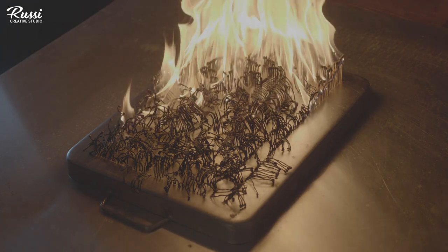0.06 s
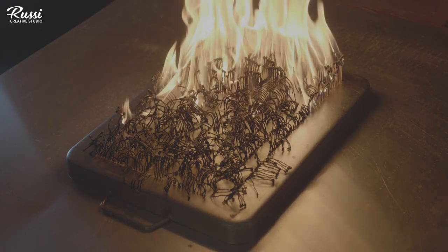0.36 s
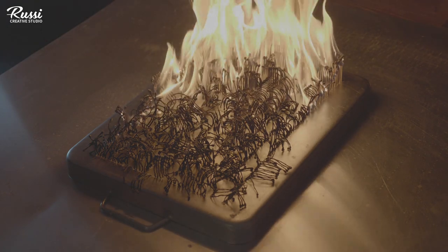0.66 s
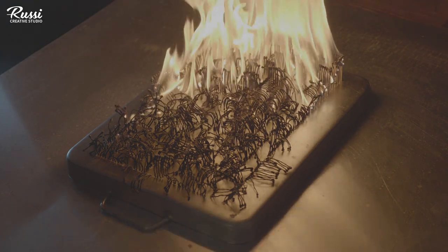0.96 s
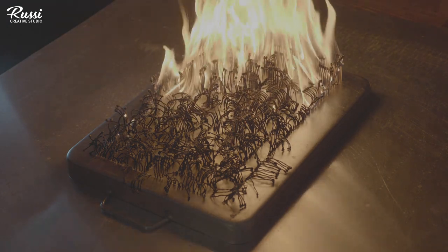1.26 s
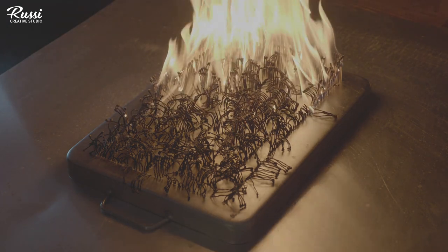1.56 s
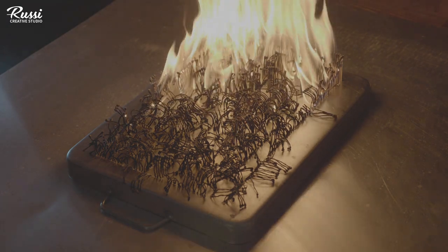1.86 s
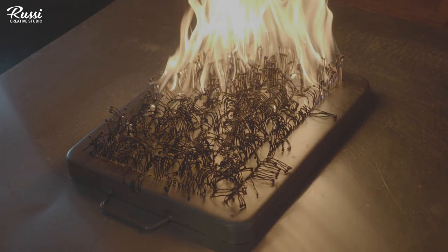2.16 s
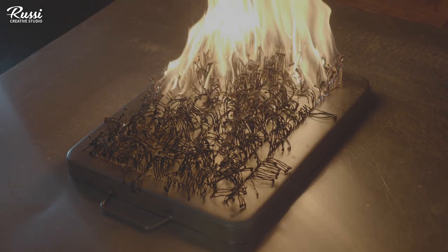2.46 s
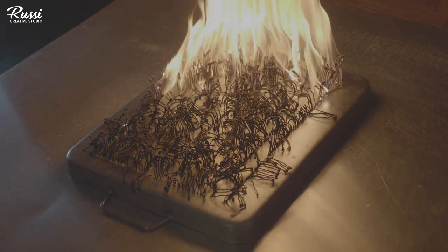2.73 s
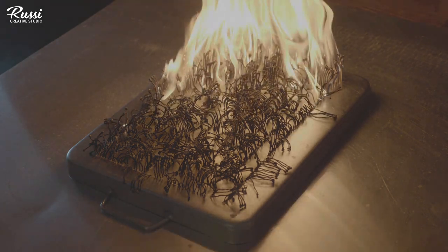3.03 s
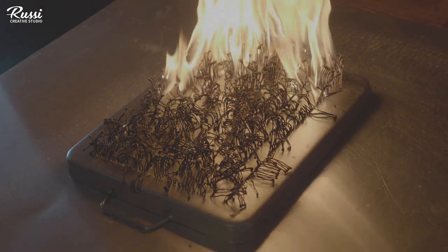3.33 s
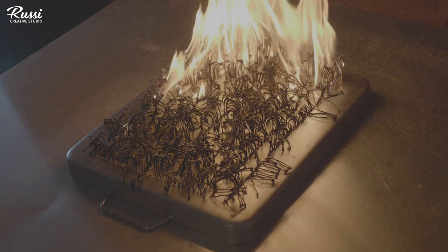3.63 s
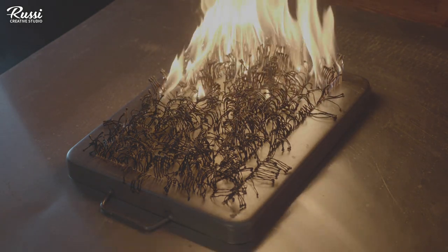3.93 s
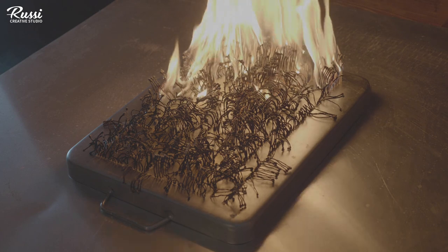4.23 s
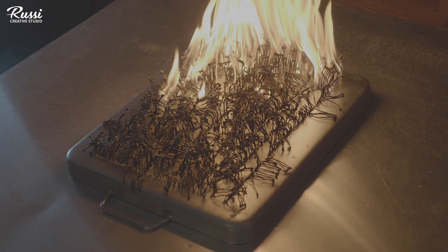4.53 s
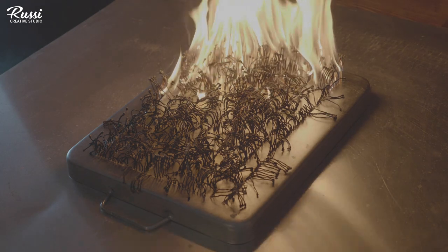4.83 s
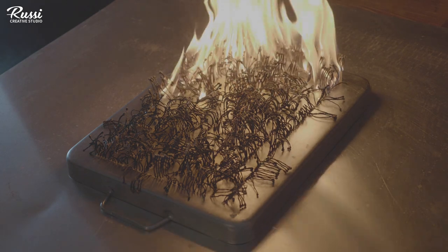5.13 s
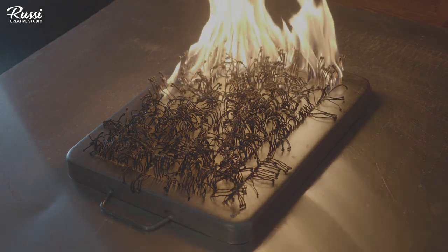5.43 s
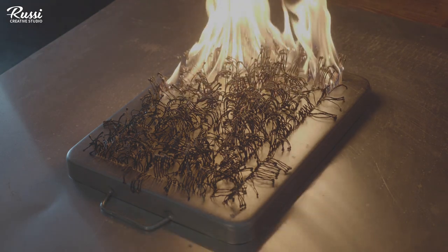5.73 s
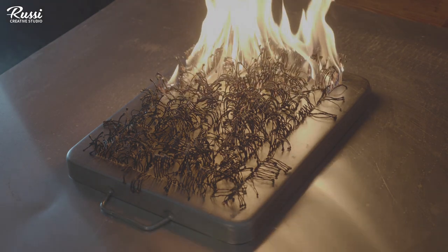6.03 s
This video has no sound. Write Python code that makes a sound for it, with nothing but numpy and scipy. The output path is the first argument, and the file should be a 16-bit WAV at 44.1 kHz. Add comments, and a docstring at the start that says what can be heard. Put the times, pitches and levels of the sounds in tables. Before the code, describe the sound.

Overlapping bursts of fizzing hiss come from match heads catching fire, mixed with crisp crackles and a soft, steady flame rush. The hissing fades around the middle, and the quieter fire keeps sizzling and ticking while sticks snap irregularly and gas puffs out twice. It is heard from nearby in a small, hard-walled room that gives each snap a brief echo.

```python
"""In a small room with hard walls, a bed of upright matchsticks burns on a tray.
The flames make a low, steady rush, the hot wood sizzles and trapped gas puffs out.
Match heads flare up as tiny jets, in hissing waves that die down about halfway through.
Embers tick and the charring sticks snap. Each snap is one very short pulse,
followed by a few close echoes and a brief tail of room sound."""
import sys
import numpy as np
from scipy import signal
from scipy.fft import rfft, irfft
from scipy.io import wavfile

SR = 44100
rng = np.random.default_rng(int(sys.argv[2]) if len(sys.argv) > 2 else 0)


def inscribe(sig):
    """Save sig as 16-bit PCM at rate SR to the path in sys.argv[1].

    A 1-D sig is mono; a 2-D sig holds one channel per row.
    Samples are clipped to [-1, 1] before scaling.
    """
    pcm = np.round(np.clip(np.atleast_2d(sig).T, -1, 1) * 32767)
    wavfile.write(sys.argv[1], SR, pcm.astype(np.int16))


N = 268128
TIME_S = np.arange(N) / SR
FREQUENCIES_HZ = np.maximum(np.arange(N // 2 + 1) * SR / N, 1)
CUTOFF_HZ = 15900


def from_db(db):
    """Turn decibels into a number to multiply a sound by."""
    return 10 ** (np.asarray(db) / 20)


def unit_level(x):
    """Scale a signal so that its average level (rms) is 1."""
    return x / np.sqrt(np.mean(x ** 2) + 1e-20)


def band(x, low_hz, high_hz, order=1):
    """Keep the sound between two pitches; a higher order cuts the rest more sharply."""
    edges_hz = [low_hz, min(high_hz, .47 * SR)]
    return signal.sosfilt(signal.butter(order, edges_hz, "band", fs=SR, output="sos"), x + 1e-18)


def drift(rate_hz):
    """A smooth random wobble with a typical size of 1."""
    points = rng.standard_normal(4096)
    return unit_level(np.interp(TIME_S * rate_hz * 2, np.arange(len(points)), points))


# Pitches that the tray, table and room boost or swallow: pitch_hz, width_hz, lift_db
SURROUNDING_RESONANCES = [(238.6, 9.3, 11.5), (260, 12, -7), (279, 16, 9), (345, 30, 4), (360, 9, 9),
                          (386, 24, 5), (505, 40, 9), (531, 16, 11), (562, 13, -8), (587, 12, 6),
                          (603, 10, -6), (632, 18, 5), (663, 18, 8), (681, 10, -5), (722, 33, 7),
                          (872.3, 24, 10.5), (904, 17, 7), (968, 8, 9), (1025, 57, 5), (1195, 20, 6),
                          (1392, 14, 8), (1472, 14, 7), (1630, 20, 5), (1810, 18, 7), (1965, 20, 8),
                          (2085, 60, -6), (2153, 14, 6), (2240, 18, 7), (2396, 20, 7), (2850, 400, -3),
                          (3535, 25, 4.5), (3655, 25, 3.5), (3980, 25, 3.5), (4289, 18, 5), (4410, 18, 4.5),
                          (4489, 16, 4.5), (4614, 16, 5), (4740, 18, 4), (4985, 25, 3.5), (5350, 300, 2),
                          (5987, 18, 6), (6305, 25, 5), (7350, 320, 3), (9200, 300, 2.5)]
def colouring(spectrum, hz, depth=1):
    """Gain at each pitch: a broad tone shape plus the resonances, their lift multiplied by depth."""
    points_hz, points_db = np.transpose(spectrum)
    broad_db = np.interp(np.log(hz), np.log(points_hz), points_db)
    resonance_db = sum(lift_db / (1 + (2 * (hz - pitch_hz) / width_hz) ** 2)
                       for pitch_hz, width_hz, lift_db in SURROUNDING_RESONANCES)
    return from_db(broad_db + depth * resonance_db)


def turbulence(spectrum, side_db, wide_above_hz):
    """Swirling gas makes stereo noise, coloured by its surroundings; side_db sets how wide it sounds."""
    white = rng.standard_normal((2, N))
    middle, side = irfft(rfft(white) * colouring(spectrum, FREQUENCIES_HZ), N)
    side = from_db(side_db) * band(side, wide_above_hz, SR, order=2)   # low sounds reach both ears alike
    return unit_level(middle + np.array([side, -side]))


# First echoes from nearby surfaces: delay_s, left_db, right_db
CLOSE_ECHOES = [(.0058, -9.0, -4.0), (.0068, -6.5, -19.0), (.0078, -16.0, -15.0), (.0093, -13.0, -18.0)]
# Tone of the room's tail: pitch_hz, relative_db
TAIL_SPECTRUM = [(150, -8), (1500, -16), (2200, 6.5), (4500, 0.1), (6500, -0.5), (10000, -1.7),
                 (15500, 2.5), (20000, -13)]
def room_echoes(resonance_depth=0, fade_60db_s=0.25, build_s=0.0034, tail_db=2.27, side_db=-9):
    """The room answers a click with a few close echoes and a dense tail, wide only in the treble."""
    t = np.arange(SR // 3) / SR
    fade = from_db(-60 * t / fade_60db_s) * (1 - np.exp(-(t / build_s) ** 2))
    hz = np.maximum(np.fft.rfftfreq(len(t), 1 / SR), 1)
    colour = colouring(TAIL_SPECTRUM, hz, resonance_depth)
    noise = irfft(rfft(rng.standard_normal((2, len(t)))) * colour, len(t))
    middle, side = noise * fade / np.linalg.norm(fade)
    side = from_db(side_db) * band(side, 2800, SR, order=2)
    answer = from_db(tail_db) * np.array([middle + side, middle - side])
    for delay_s, left_db, right_db in CLOSE_ECHOES:
        answer[:, round(delay_s * SR)] += from_db([left_db, right_db])
    return answer


# Tone of the flames' rush: pitch_hz, relative_db
RUSH_SPECTRUM = [(20, -33), (90, -37), (150, -32.5), (200, -25), (250, -12), (300, -8), (480, -4.5),
                 (580, -3.5), (700, -4.5), (1000, -7), (1300, -10.5), (1700, -15.5), (2300, -17),
                 (4000, -37), (9000, -62)]
# Moments when the low rush briefly grows louder (+) or softer (-): peak_s, lift_db
RUSH_SWELLS = [(0.07, 3.5), (0.27, -5), (0.94, 3), (1.17, 4), (1.4, 3.5), (2.04, 4), (2.32, -2.5),
               (3.46, -2), (3.71, 3), (4.3, 0.5), (4.97, -5), (5.05, 3.5), (5.13, -2), (5.57, 3),
               (5.66, 4.5), (5.76, -1.5), (5.84, 1.5)]
def flames(start_db=-55, fade_db_per_s=0.33, swell_s=0.03, flutter_db=1.0):
    """The tall flames make a low, fluttering rush that slowly fades, with brief swells and dips."""
    swell_db = sum(lift_db * np.exp(-((TIME_S - peak_s) / swell_s) ** 2)
                   for peak_s, lift_db in RUSH_SWELLS)
    level_db = start_db - fade_db_per_s * TIME_S + swell_db + flutter_db * drift(14)
    return from_db(level_db) * turbulence(RUSH_SPECTRUM, side_db=-33.5, wide_above_hz=1200)


# Tone of the sizzling wood: pitch_hz, relative_db
SIZZLE_SPECTRUM = [(200, -44), (2000, -5), (3500, -0.5), (5500, -2.5), (7400, -1), (10300, -6), (13000, 1),
                   (15500, 2)]
# How loud the sizzle is as time passes: time_s, level_db
SIZZLE_LOUDNESS = [(0, -51.5), (0.45, -80), (0.6, -62), (0.85, -56), (2.0, -58.5), (2.799, -54),
                   (3.35, -62), (3.53, -57.5), (3.61, -62.5), (3.8, -59.5), (4.25, -58.5), (4.38, -62),
                   (4.46, -59), (4.63, -60), (4.71, -55.5), (4.78, -59.5), (5.0, -54), (5.45, -57),
                   (5.66, -59), (5.82, -58.5), (5.95, -51), (6.08, -60)]
def wood_sizzle():
    """The hot wood keeps up a fine, bright sizzle that swells and lulls."""
    level_db = np.interp(TIME_S, *np.transpose(SIZZLE_LOUDNESS))
    return from_db(level_db) * turbulence(SIZZLE_SPECTRUM, side_db=-4.5, wide_above_hz=2500)


# Short puffs of gas: peak_s, tone_db, rise_s, fade_60db_s, low_pitch_hz, high_pitch_hz
GAS_PUFFS = [(3.875, -52, 0.0033, 0.2, 1630, 2200), (5.942, -50.5, 0.022, 0.22, 1530, 1630),
             (5.945, -46.5, 0.016, 0.15, 2570, 2700)]
def gas_puffs(width_ratio=1.078, hiss_vs_tone_db=-3.0):
    """Trapped gas escapes in short puffs, each with two breathy pitches over a broad hiss."""
    out = np.zeros(N)
    for peak_s, tone_db, rise_s, fade_60db_s, *pitches_hz in GAS_PUFFS:
        white = rng.standard_normal(N)
        tone = sum(band(white, hz / width_ratio, hz * width_ratio, order=2) for hz in pitches_hz)
        hiss = band(rng.standard_normal(N), 1400, 6500, order=2)
        rise = np.exp(np.minimum(TIME_S - peak_s, 0) / rise_s)
        fall = from_db(tone_db - 60 * np.clip(TIME_S - peak_s, 0, 1) / fade_60db_s)
        out += rise * fall * (unit_level(tone) + from_db(hiss_vs_tone_db) * unit_level(hiss))
    return out


# Groups of match heads catching fire:
# start_s, rise_s, burn_s, strength_db, extra_roar_db, extra_rasp_db, extra_fizz_db
HEAD_FLARES = [(-0.1, 0.04, 0.057, -52.5, 6, 0, -2), (0.08, 0.02, 0.35, -49.5, -0.5, -1, 2),
               (0.503, 0.026, 0.18, -48, -2, -4, 3), (0.6, 0.05, 0.11, -54, 6.5, -8, -1),
               (0.855, 0.048, 0.57, -45, 1.5, 2, -2), (1.0, 0.06, 0.21, -43.5, 1, 3.5, -15),
               (1.3, 0.023, 0.13, -46, 0.5, 4, -6), (1.451, 0.049, 0.42, -46.5, 1.5, -1, 1),
               (1.579, 0.0095, 0.033, -50, 4, 9, -12), (1.895, 0.088, 0.66, -43.5, -2, -3.5, -5),
               (2.09, 0.027, 0.057, -46, 6.5, 6.5, -2), (2.34, 0.011, 0.32, -48, 3, -1, -0.5),
               (2.73, 0.054, 0.1, -53.5, -5, -3, 0), (2.875, 0.055, 0.14, -48, -2, -3, -1),
               (3.12, 0.029, 0.15, -50.5, -0.5, -5.5, -4), (3.32, 0.034, 0.18, -59, 6.5, -3, 3)]
def blaze(full_blaze_db=-42.5, sag_db_per_s=2, fade_60db_s=0.5, roar_growth=1.41, rasp_growth=1.04):
    """Heads catch, weaken and die away: the strength of hiss, roar, rasp and fizz, 1 at full blaze."""
    power = np.zeros((4, N))
    for start_s, rise_s, burn_s, strength_db, extra_roar_db, extra_rasp_db, extra_fizz_db in HEAD_FLARES:
        age_s = np.maximum(TIME_S - start_s, 0)
        fall_db = sag_db_per_s * age_s + 60 * np.maximum(age_s - burn_s, 0) / fade_60db_s
        hiss = np.minimum(age_s / rise_s, 1) * from_db(strength_db - full_blaze_db - fall_db)
        roar = from_db(extra_roar_db) * hiss ** roar_growth   # grows faster than the hiss
        rasp = from_db(extra_rasp_db) * hiss ** rasp_growth
        fizz = from_db(extra_fizz_db) * hiss
        power += np.array([hiss, roar, rasp, fizz]) ** 2   # separate noises add up by power
    return np.sqrt(power)


def tray_bounce(sound, delay_s=0.00023, swing_s=0.00002, share=0.17):
    """The jets' sound bounces off the tray, sooner or later as they dance, gently shifting its tone."""
    samples = np.arange(N)
    lag = (delay_s + swing_s * drift(2.96)) * SR
    return sound + share * np.array([np.interp(samples - lag, samples, channel) for channel in sound])


# Tones of the jets' bright hiss, fine fizz, rough rasp and throaty roar: pitch_hz, relative_db
HISS_SPECTRUM = [(200, -43), (1200, -50), (2200, -13), (2900, -0.5), (3600, 1), (4950, 4.5), (6000, 0),
                 (8000, -3.5), (10000, -8.5), (12000, -5.5), (15500, -11)]
FIZZ_SPECTRUM = [(3000, -49), (5500, -5), (6800, -19), (8500, -15), (10200, -2), (11800, 1.5), (13500, 0),
                 (15500, -2)]
RASP_SPECTRUM = [(500, -39.5), (1500, -9), (2200, 2), (3100, 1), (4500, -8), (6500, -1), (10000, -15)]
ROAR_SPECTRUM = [(250, -50), (450, -25), (700, -4.5), (950, 1), (1500, 4), (2000, -2), (2600, -2.5),
                 (3500, -4.5), (6000, -36)]
def match_jets(hiss_db=-42.97, fizz_db=-48, rasp_db=-49, roar_db=-45.5, ember_db=-66, sputter_db=1.1):
    """Match heads burn as small, sputtering jets; returns their bright sounds and their lower roar."""
    hiss_strength, roar_strength, rasp_strength, fizz_strength = blaze()
    roar_gain = from_db(roar_db + 0.36 * drift(12)) * roar_strength
    roar_gain = np.hypot(roar_gain, from_db(ember_db))   # a little keeps burning between flares
    sputter = from_db(sputter_db * drift(40))
    hiss_gain = from_db(hiss_db + 0.3 * drift(3.61)) * hiss_strength
    hiss = hiss_gain * turbulence(HISS_SPECTRUM, side_db=-9.5, wide_above_hz=2100)
    fizz_gain = from_db(fizz_db + 2.0 * drift(12)) * fizz_strength
    fizz = fizz_gain * turbulence(FIZZ_SPECTRUM, side_db=-14.5, wide_above_hz=1700)
    rasp_gain = from_db(rasp_db + 1.6 * drift(14)) * rasp_strength
    rasp = rasp_gain * turbulence(RASP_SPECTRUM, side_db=-18, wide_above_hz=5700)
    roar = roar_gain * turbulence(ROAR_SPECTRUM, side_db=-50, wide_above_hz=270)
    return sputter * (tray_bounce(hiss + fizz) + rasp), sputter * roar


def fibre_crack(clicks, pitch_hz, width_ratio=1.71, bass_cut_ratio=0.31, ring_hz=7200, ring_share=0.34):
    """A wood fibre breaks at each click: one quick swing, with a trace of the stick's ring."""
    def swing(x):
        x = band(x, pitch_hz / width_ratio, pitch_hz * width_ratio)
        x = band(x, bass_cut_ratio * pitch_hz, SR, order=2)   # finer fibres have less bass
        return x + ring_share * band(x, ring_hz / 1.075, ring_hz * 1.02)
    one_crack = band(swing(signal.unit_impulse(256)), 20, CUTOFF_HZ, order=2)
    return swing(clicks) / np.linalg.norm(one_crack)   # the same energy at every pitch


def ember_ticks(ticks_per_s=45, base_db=-46, spread_db=1.5, flare_lift_db=19.5):
    """Embers tick at random, in clusters, most of them faintly, and harder while heads are flaring."""
    flaring = np.minimum(blaze()[0], 1)
    has_tick = rng.random(N) < ticks_per_s * from_db(3 * drift(4)) / SR
    scatter_db = spread_db * np.minimum(rng.exponential(1, N), 3.5)
    clicks = has_tick * from_db(base_db + scatter_db + flare_lift_db * flaring)
    pitches_hz = np.geomspace(5500, 11500, num=4)
    pitch_choice = rng.integers(0, len(pitches_hz), N)
    return sum(fibre_crack(clicks * (pitch_choice == k), hz) for k, hz in enumerate(pitches_hz))


# Sticks snapping, some dry, others with more room echo: start_s, strength_db, pitch_hz, extra_room_db
STICK_SNAPS = [(0.0651, -2.5, 9100, -0.3), (0.3712, -13.5, 9000, -12), (0.716, -18.5, 12000, -9),
               (0.7488, -11.5, 7060, -3.5), (0.821, -24.5, 10060, -11), (0.9113, -20, 9550, 2),
               (0.962, -17.5, 10800, 2), (1.0373, -9, 6500, -8), (1.1034, -18, 9000, 1),
               (1.1743, -6.5, 12600, -4.5), (1.4701, -14.5, 5970, -2), (1.6172, -17, 5530, -14),
               (1.6732, -24, 9900, -6), (1.6929, -15, 10000, 1.5), (2.001, -15.5, 11500, -13),
               (2.0672, -11.5, 13800, -5), (2.1387, -4.5, 14100, -3), (2.5218, -11.5, 6900, -14),
               (2.6893, -17.5, 9020, -1.5), (2.74, -21.5, 11000, 6), (2.7714, -13, 9900, -5),
               (2.8913, -27, 10000, -3.5), (2.9585, -22, 10000, -5), (2.9946, -23, 10000, -5),
               (3.1158, -14, 9150, -5.5), (3.2598, -12, 11000, -4.5), (3.3871, -29, 9500, -8.5),
               (3.557, -33, 9500, -27), (3.6624, -25, 10500, -2), (3.6962, -33, 10000, -8),
               (3.7165, -26, 10700, -2), (3.7241, -16.5, 9900, -3.5), (3.867, -23.5, 11500, -3),
               (3.9066, -30, 10000, -4), (3.9515, -19.5, 9300, -4), (4.0302, -14.5, 9300, -0.5),
               (4.0896, -7.5, 10900, -3), (4.1121, 0, 8050, -2.5), (4.1849, -21, 8900, -5),
               (4.209, -26, 9300, -1), (4.2252, -21, 7000, -2), (4.2526, -22.5, 11200, -1.5),
               (4.4492, -36, 10000, -7), (4.477, -30, 8500, -2), (4.5122, -22, 10500, 1.5),
               (4.579, -25, 10900, -6), (4.651, -20.5, 10600, -3.5), (4.691, -29, 10000, 1),
               (4.729, -27.5, 10000, -4), (4.81, -22.5, 10700, -7), (4.8496, -16.5, 8500, -3),
               (4.88, -14.5, 8700, -3.5), (4.9109, -13, 9700, -2), (5.025, -23.5, 8000, -1),
               (5.029, -28, 10700, -2.5), (5.0627, -15, 8800, -3.5), (5.1009, -13.5, 8750, -5.5),
               (5.186, -22.5, 8400, -7), (5.2906, -11, 9500, -2), (5.353, -26, 8800, -3),
               (5.3766, -28, 10200, 1), (5.5243, -27, 9000, 1), (5.536, -12.5, 6940, -4),
               (5.8568, -16.5, 7200, -2.5), (5.9434, -19.5, 9450, -2), (5.983, -24, 10000, 0),
               (5.9941, -29, 10000, -3), (6.0406, -30, 10000, 0), (6.0663, -24.5, 10000, -6)]
def stick_snaps(trim_db=-2.52):
    """Charring sticks snap loudly; each stands in its own spot, so the room answers each differently."""
    out = np.zeros((2, N + SR))
    for start_s, strength_db, pitch_hz, extra_room_db in STICK_SNAPS:
        pulse = from_db(strength_db + trim_db) * fibre_crack(signal.unit_impulse(256), pitch_hz)
        paths = from_db(extra_room_db) * room_echoes(resonance_depth=1.2)
        paths[:, 0] += 1   # the sound that comes straight to the ear
        heard = signal.fftconvolve(pulse[None], paths, axes=1)
        start = round(start_s * SR)
        out[:, start:start + heard.shape[1]] += heard
    return out[:, :N]


def scene(lean_right_db=0.4, hiss_to_room_db=-12):
    """The fire sits slightly to the right; its low sounds reach both ears alike."""
    jets, roar = match_jets()
    hiss = jets + wood_sizzle() + gas_puffs()
    ticks = ember_ticks()
    to_room = ticks + from_db(hiss_to_room_db) * hiss.mean(axis=0)
    room = signal.fftconvolve(to_room[None], room_echoes(), axes=1)[:, :N]
    balance = from_db([[-lean_right_db], [lean_right_db]])
    return (hiss + stick_snaps() + ticks + room) * balance + roar + flames()


def record(dry):
    """Cut off the very highest treble steeply."""
    return irfft(rfft(dry) / (1 + (FREQUENCIES_HZ / CUTOFF_HZ) ** 120), N)


dry = scene()
out = record(dry)
inscribe(out)
```